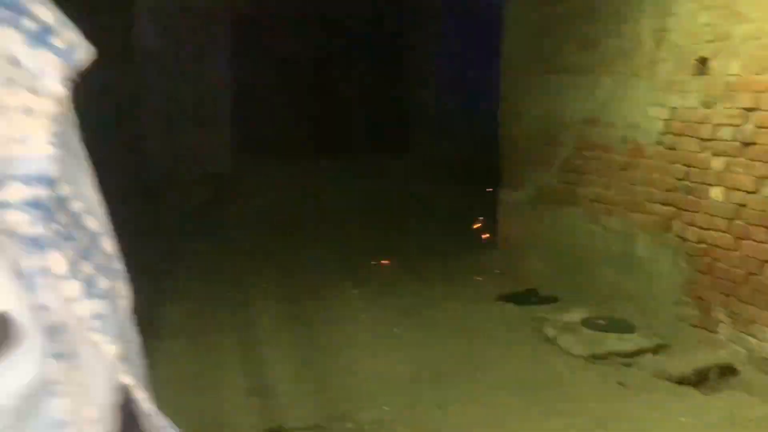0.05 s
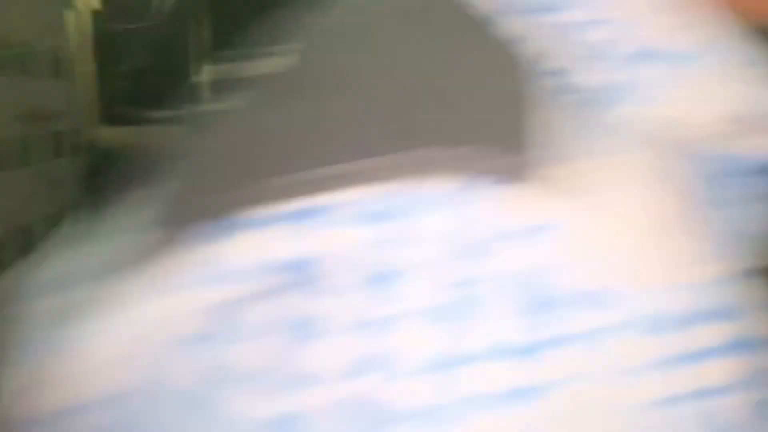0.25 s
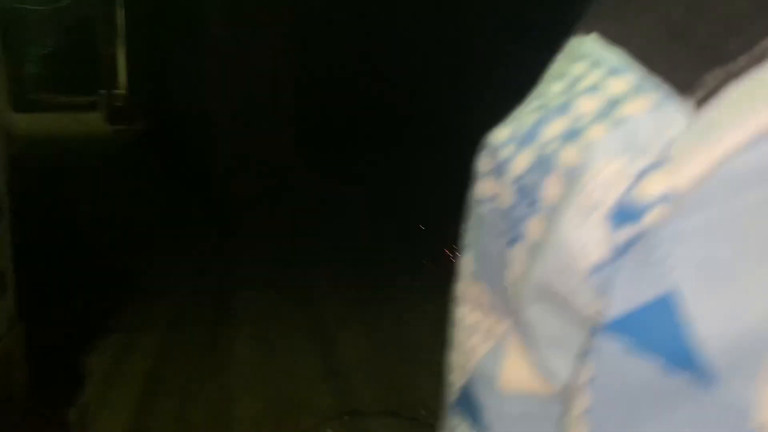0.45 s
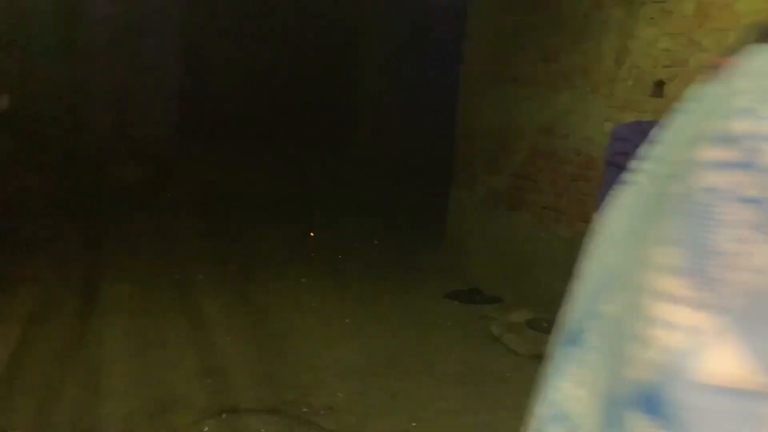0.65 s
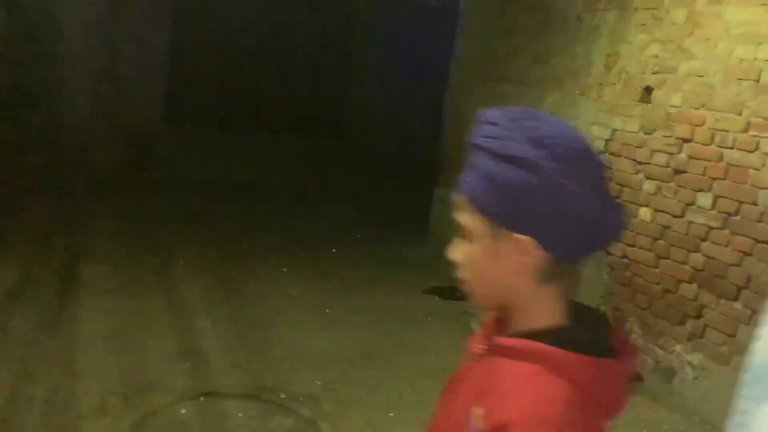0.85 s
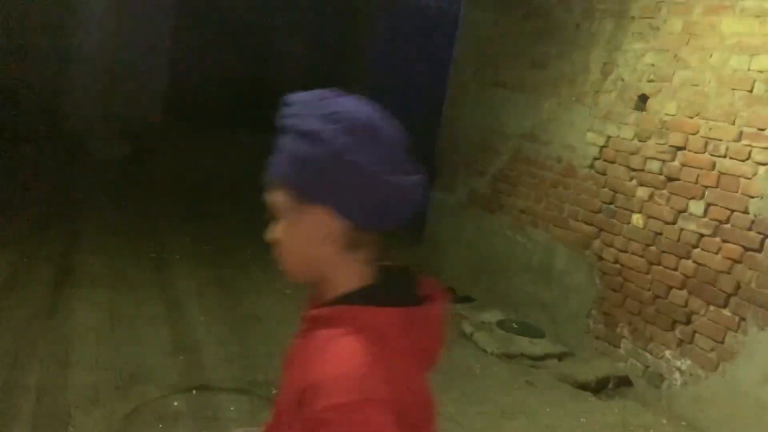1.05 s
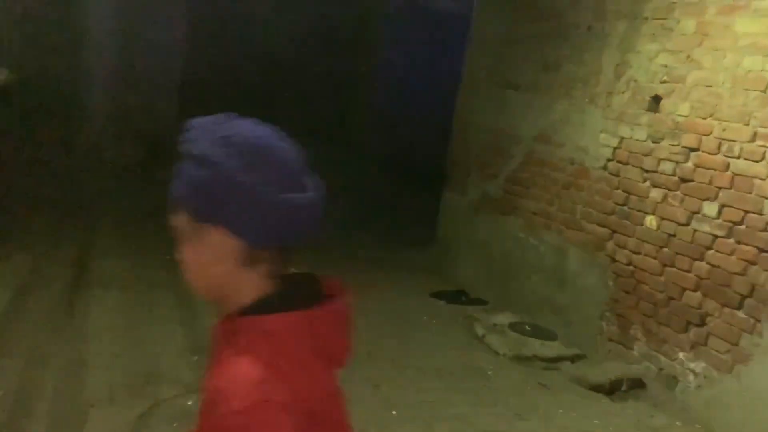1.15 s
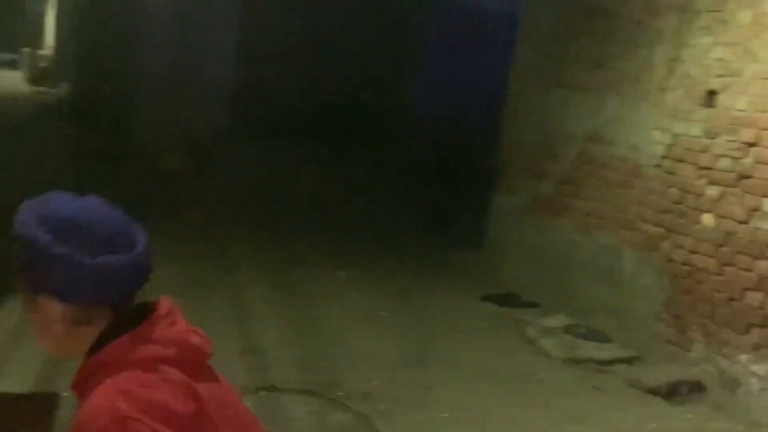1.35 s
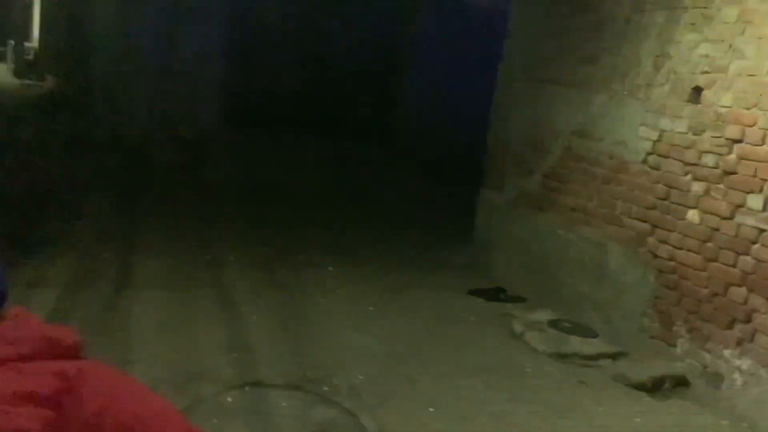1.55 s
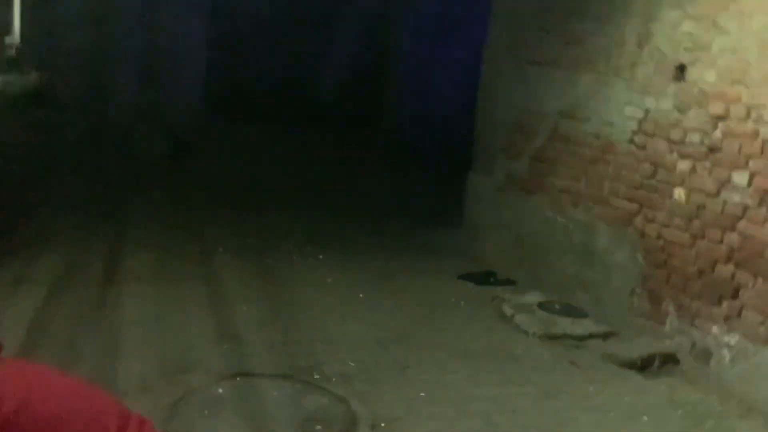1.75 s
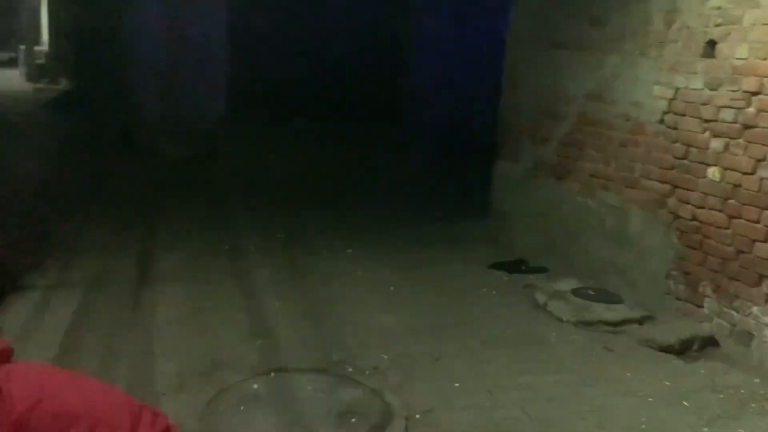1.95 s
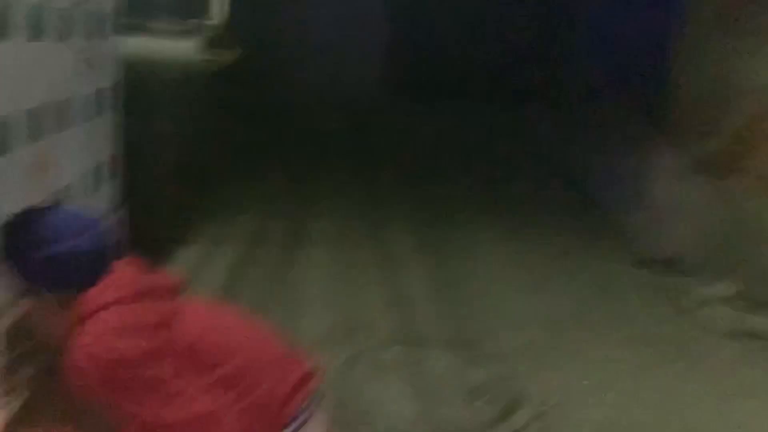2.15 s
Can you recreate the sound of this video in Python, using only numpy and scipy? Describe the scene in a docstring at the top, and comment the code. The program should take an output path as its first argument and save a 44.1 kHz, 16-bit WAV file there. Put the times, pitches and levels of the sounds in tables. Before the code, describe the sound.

A firecracker bang dominates: a soft dying roll, light scuffs and a tiny metal tinkle open the scene, then a rasping rush at 0.24 s leads into a sharp, slightly clipped crack at 0.26 s. Slaps off close brick walls and a rolling echo swell until about 0.6 s, gone by 0.9. Afterwards, close faint grit scuffs and dry ticks, clearest near 1.1, 1.3 and 1.8 s, with a tinkle near 2.0, over fading low hum.

```python
"""A firecracker goes off in a brick-walled lane at night. A rasping rush of noise leads into it, then come the
crack and its slaps off the near walls as push-and-suction pulses, then ringing sine tones and quickly dying
noise. A roll of shaped noise from down the lane starts as the dying roll of an earlier cracker and swells
again. Close by, feet scuff the grit (grainy noise bursts), small things tick and a bit of metal tinkles (short
fading sines). The town's hum is soft, low noise underneath. The loudest peaks are softly clipped."""
import sys
import numpy as np
from scipy import signal
from scipy.fft import rfft, irfft, next_fast_len
from scipy.io import wavfile
from scipy.ndimage import uniform_filter1d, map_coordinates

SR = 44100
rng = np.random.default_rng(int(sys.argv[2]) if len(sys.argv) > 2 else 0)


def inscribe(sig):
    """Save sig as 16-bit PCM at rate SR to the path in sys.argv[1].

    A 1-D sig is mono; a 2-D sig holds one channel per row.
    Samples are clipped to [-1, 1] before scaling.
    """
    pcm = np.round(np.clip(np.atleast_2d(sig).T, -1, 1) * 32767)
    wavfile.write(sys.argv[1], SR, pcm.astype(np.int16))


N = 97020
T = np.arange(N) / SR  # time of every sample [s]
CRACK_S = .2635  # when the firecracker bursts


def amp(db):
    """Turn decibels into a plain multiplier."""
    return 10 ** (np.asarray(db) / 20)


def per_side(left_right_db):
    """Turn a left and a right level [dB] into one multiplier for each side."""
    return amp(left_right_db)[:, None]


def unit(x):
    """Scale x to an average (rms) strength of 1."""
    return x / np.sqrt(np.mean(x ** 2) + 1e-20)


def along(points, hz):
    """Read a curve of (frequency [Hz], value) points, spaced by pitch (log frequency)."""
    f, v = np.transpose(points)
    return np.interp(np.log(hz + 1), np.log(f + 1), v)


def filtered(x, response):
    """Multiply each frequency of x by response(hz)."""
    m = next_fast_len(N + SR // 2)
    hz = np.fft.rfftfreq(m, 1 / SR)
    return irfft(rfft(x, m) * response(hz), m)[..., :N]


def noise(spectrum, alike, patchy_db=0):
    """Stereo noise of rms 1, with random louder and softer patches in time and pitch."""
    z = signal.stft(rng.standard_normal((2, N)), nperseg=512)[2]
    field = rng.standard_normal(z.shape[1:])
    field = uniform_filter1d(uniform_filter1d(field, 4, 0), 6, 1)
    pair = signal.istft(z * amp(patchy_db * unit(field)), nperseg=512)[1][:, :N]

    def mid_side_gain(hz):
        # This share of middle and side noise makes left and right as alike as asked.
        turn = np.arccos(np.clip(along(alike, hz), -1, 1)) / 2
        return amp(along(spectrum, hz)) * [np.cos(turn), np.sin(turn)]

    mid, side = filtered(pair, mid_side_gain)
    return unit(np.array([mid + side, mid - side]))


def shaped(x, gain_db, size):
    """Change the level of x by gain_db(hz, t), which varies over both pitch and time."""
    overlap = size - size // 4
    hz, t, z = signal.stft(x, SR, nperseg=size, noverlap=overlap)
    z = z * amp(gain_db(hz[:, None], t))
    return signal.istft(z, SR, nperseg=size, noverlap=overlap)[1][..., :N]


def swell(start, rise, hold, t60):
    """A gain that rises, holds, then falls by 60 dB in t60; all in seconds."""
    u = T - start
    attack = np.clip(u / max(rise, 1e-4), 0, 1) ** 2
    return attack * amp(-60 * np.clip(u - rise - hold, 0, None) / max(t60, 1e-3))


def wobble(rate):
    """A smooth random curve through `rate` random points a second."""
    return map_coordinates(rng.standard_normal(int(N * rate / SR) + 4), [T * rate])


def bass(hz):
    """1 in the deep bass, falling to a half at 140 Hz and to almost nothing above."""
    return 1 / (1 + (hz / 140) ** 4)


# How alike left and right are, in the hum and the roll: (frequency [Hz], likeness [0 to 1])
FAR_ALIKE = [(60, 1), (240, 0.67), (950, 0.01), (3770, 0.06), (15000, 0.19)]
# Tone colour of the town's hum: (frequency [Hz], relative level per Hz [dB])
HUM_SPECTRUM = [(15, -40), (30, -14), (55, 0.5), (90, -6.5), (175, -10.5), (250, -6.5), (450, -16),
                (700, -22.5), (1300, -25), (2500, -32), (5000, -41.5), (9000, -50), (15500, -63)]
HUM_START_DB, HUM_FADE_DB_PER_S = -47.8, 6
HUM_WAVER_DB = 1.37  # typical size of the bass waver


def town_hum():
    """Many distant sounds blur into low noise; it fades steadily while its bass wavers."""
    waver_db = HUM_WAVER_DB * wobble(8)
    hum = noise(HUM_SPECTRUM, FAR_ALIKE, patchy_db=2)
    hum = shaped(hum, lambda hz, t: np.interp(t, T, waver_db) * bass(hz / 2), size=1024)
    return amp(HUM_START_DB - HUM_FADE_DB_PER_S * T) * hum


# Tone colour of the roll before it is shaped: (frequency [Hz], relative level per Hz [dB])
LANE_SPECTRUM = [(21, -39), (35, -15), (237, -2.5), (338, -10.5), (847, -12), (4440, -32), (6680, -41.5),
                 (7210, -63.5), (7790, -44), (9070, -38.5), (11700, -62.5), (12600, -50), (15500, -70.5)]
# Course of the roll: (time [s], level before tilt and bass [dB], tilt above 300 Hz [dB per octave],
# extra bass [dB])
ROLL_COURSE = [(0, -36.5, -5, -1), (0.101, -37.5, -4.5, -2), (.2, -41.5, -3, 2), (.26, -42.5, 3, 11),
               (0.332, -35.5, 2.5, -2.5), (0.391, -32.5, 0.5, -1), (.44, -34, 0.35, 1), (.48, -33, 0, 4.5),
               (.58, -30, -0.5, -2.5), (0.621, -38, 1, 1), (.7, -40, 0, -1), (.79, -45, -1.5, -7),
               (0.861, -56, 1, -0.5), (1.05, -66.5, 0, -2), (1.301, -70, -4.5, -9)]
ROLL_ROUGH_DB = 0.5  # typical size of the quick level flutter


def lane_roll():
    """Echoes of both crackers blur into noise whose level and tone change as they die away."""
    s, level_db, tilt, bass_db = np.transpose(ROLL_COURSE)

    def gain_db(hz, t):
        octaves = np.log2(np.clip(hz, 300, None) / 300)
        return np.interp(t, s, level_db) + np.interp(t, s, tilt) * octaves + np.interp(t, s, bass_db) * bass(hz)

    roll = shaped(noise(LANE_SPECTRUM, FAR_ALIKE, patchy_db=3), gain_db, size=1024)
    return roll * amp(ROLL_ROUGH_DB * wobble(60))


# One faint, thin tone: (start [s], hold [s], frequency [Hz], level [dB])
FAINT_TONE = (1.012, .07, 3420, -71)


def thin_tone():
    """A single sine fades in, holds briefly and fades out."""
    s, hold, hz, db = FAINT_TONE
    return amp(db) * swell(s, 0.023, hold, .05) * np.sin(2 * np.pi * hz * T)


# When the metal tinkles: (time [s], level of the whole tinkle [dB])
TINKLE_TIMES = [(0.013, -49), (1.25, -61), (1.987, -55), (2.107, -67)]
# Ringing tones of the bit of metal: (frequency [Hz], middle level [dB], time to fall 60 dB [s])
METAL_TONES = [(2930, -11, 0.042), (3440, -5, 0.058), (4500, 3, 0.055), (6360, -8, 0.08), (7950, -1, .05),
               (8900, -9, 0.094), (10200, -11, 0.048), (13030, 1, 0.073)]


def tinkles():
    """Metal rings at several pitches, each fading at its own speed and varied at random each time."""
    out, t = np.zeros((2, N + SR)), np.arange(SR // 5) / SR
    for s, db in TINKLE_TIMES:
        ring = 0
        for hz, level, t60 in METAL_TONES:
            fade = amp(level + rng.normal(0, 4.7, (2, 1)) - 60 * t / t60)
            ring = ring + fade * np.sin(2 * np.pi * (hz * t + rng.random((2, 1))))
        soft_start = 1 - np.exp(-t / 0.00092)
        out[:, round(s * SR):][:, :len(t)] += amp(db) * ring * soft_start
    return out[:, :N]


# Small dry ticks: (time [s], level [dB], frequency [Hz], ring length [cycles],
# noise snap relative to the level [dB])
TICK_LIST = [(.832, -50.5, 4500, 3, -5.5), (1.066, -54.5, 4060, 10, -11), (1.107, -42, 5000, 3, -6.5),
             (1.3089, -41, 1620, 4, -13.5), (1.309, -46.5, 2430, 6, -12.5), (1.3155, -51, 4500, 6.2, -9.5),
             (1.349, -33, 1180, 1.5, -35), (1.3524, -39, 1840, 2.5, -40), (1.475, -46, 706, 1.6, -30),
             (1.7535, -44, 864, 3.2, -14.5), (1.753, -45.5, 387, 3.5, -30),
             (1.817, -45.5, 2500, 3.5, -14.5), (2.187, -46, 251, 2.2, -39)]
TICK_RISE_S = 0.0003


def ticks():
    """A knocked small thing gives a snap of noise and a few quickly fading cycles of a sine."""
    out, t = np.zeros((2, N + SR)), np.arange(SR // 5) / SR
    soft_start = 1 - np.exp(-(t / TICK_RISE_S) ** 2)
    for s, db, hz, cycles, snap_db in TICK_LIST:
        snap = amp(snap_db) * rng.standard_normal((2, len(t))) * amp(-60 * t / 0.0082)
        ring = np.sin(2 * np.pi * hz * t) * np.exp(-2 * t * hz / cycles) * soft_start
        out[:, round(s * SR):][:, :len(t)] += amp(db) * (ring + snap)
    return out[:, :N]


# Tone colour of grit before each scuff's tilt: (frequency [Hz], relative level per Hz [dB])
GRIT_SPECTRUM = [(350, -29), (600, -6), (1300, -10), (2790, 1.5), (7040, -4.5), (8750, -1), (10700, -3),
                 (11600, -33.5), (13000, -1.5), (15500, -20.5)]
# Scuffs: (start [s], rise [s], hold [s], time to fall 60 dB [s], level before tilt and pan [dB],
# tilt around 5 kHz [dB per octave])
SCUFF_LIST = [(.005, 0.0027, 0.0017, 0.19, -50, -2), (0.051, .03, 0.011, 0.26, -66.5, 3.5),
              (.115, 0.0055, .015, 0.26, -61, 3), (.2, 0.0042, .012, 0.16, -50.5, 4.5),
              (.605, 0.018, 0.049, 0.18, -58.5, 7), (0.861, 0.027, .04, 0.2, -85, 9.5),
              (1.063, 0.0025, 0.0012, 0.13, -62, -0.5), (1.101, 0.012, .004, 0.15, -53.5, 2.5),
              (1.12, .008, 0.016, 0.164, -54.5, -6), (1.2, 0.0045, 0.037, 0.41, -68.5, 2.5),
              (1.307, .002, 0.0081, 0.1505, -65, -7), (1.248, 0.0063, 0.01, 0.1456, -60, 3.5),
              (1.39, .005, 0.0067, 0.13, -75.5, -1), (1.413, .004, .005, 0.42, -67.5, -6),
              (1.458, 0.037, 0.041, .12, -55.5, 3.5), (1.645, 0.0062, 0.0546, 0.204, -71.5, -1.5),
              (1.746, 0.0065, 0.039, .06, -54.5, -4), (1.808, 0.0043, 0.01, 0.18, -53.5, -4),
              (1.964, 0.019, 0.0088, 0.2, -48, -1.5), (2.091, .008, 0.023, .1, -68.5, 1),
              (2.135, 0.027, 0.0079, 0.12, -67, -9), (2.172, 0.01, 0.0095, 0.14, -73.5, 6.5)]
GRIT_ALIKE = 0.053  # left-right likeness
GRAIN_DB, FEET_PAN_DB = 4, -2  # typical grain unevenness; left level minus right level


def feet():
    """Each scuff drags grains of grit, heard as uneven noise tilted dull or bright."""
    grains = amp(GRAIN_DB * unit(uniform_filter1d(rng.exponential(size=N), 30)))
    grit = unit(grains * noise(GRIT_SPECTRUM, [(1000, GRIT_ALIKE)], patchy_db=1.8))
    out = np.zeros((2, N))
    for start, rise, hold, t60, db, tilt in SCUFF_LIST:
        scuff = grit * swell(start, rise, hold, t60)
        out += filtered(scuff, lambda hz: amp(db + tilt * np.log2((hz + 300) / 5000)))
    return out * per_side([FEET_PAN_DB / 2, -FEET_PAN_DB / 2])


# Tone colour of the near walls' echo: (frequency [Hz], relative level per Hz [dB])
NEAR_SPECTRUM = [(30, -40), (70, -16.5), (150, -13.5), (290, -6.5), (620, -13.5), (1190, -11.5),
                 (3300, -28.5), (7000, -32.5), (9900, -25), (11500, -42.5), (14000, -35.5), (15500, -43.5)]
# How fast that echo dies: (frequency [Hz], time to fall 60 dB [s])
NEAR_DECAY = [(60, 0.47), (250, 0.29), (1000, .22), (4000, .22), (12000, 0.18)]
# How alike its left and right are: (frequency [Hz], likeness [0 to 1])
NEAR_LIKENESS = [(60, 0), (200, 1), (600, .2), (1500, 0)]
NEAR_DB = -12.5


def near_walls():
    """Dense echoes between the near walls blur into noise, each pitch dying at its own speed."""
    def decay_db(hz, t):
        return -60 * np.clip(t - CRACK_S, 0, 1) / along(NEAR_DECAY, hz)

    walls = shaped(noise(NEAR_SPECTRUM, NEAR_LIKENESS), decay_db, size=256)
    return amp(NEAR_DB) * walls * swell(CRACK_S, .002, 9, 1)  # the hold outlasts the scene


# Ringing air between the walls: (frequency [Hz], left level [dB], right level [dB],
# time to fall 60 dB [s])
AIR_TONES = [(78.2, -20.5, -15.5, 0.15), (249.4, -20, -11.5, 0.1), (968, -17, -18.5, .06),
             (2010, -19, -26.5, 0.038)]


def boom():
    """The crack sets the air between the walls ringing as a few fading sines."""
    u = np.clip(T - CRACK_S, 0, None)
    return sum(per_side([left, right]) * amp(-60 * u / t60) * np.sin(2 * np.pi * hz * u)
               for hz, left, right, t60 in AIR_TONES)


THUMP_DROP_HZ, THUMP_END_HZ, THUMP_FALL_S = 860, 340.5, .0016  # starts at the sum of both pitches
THUMP_HOLD_S, THUMP_T60_S = 0.0053, .04
THUMP_DB = [-8.5, -12]  # left, right


def thump():
    """A short sine falls quickly in pitch, holds briefly and stops."""
    u = np.clip(T - CRACK_S, 0, None)
    # Adding up the falling pitch over time gives the turns of the sine so far.
    turns = THUMP_END_HZ * u + THUMP_DROP_HZ * THUMP_FALL_S * (1 - np.exp(-u / THUMP_FALL_S))
    gain = swell(CRACK_S, 0.00031, THUMP_HOLD_S, THUMP_T60_S)
    return per_side(THUMP_DB) * gain * np.sin(2 * np.pi * turns)


# Tone colour of the rush before its tones: (frequency [Hz], relative level per Hz [dB])
RUSH_SPECTRUM = [(100, -21), (300, -5), (600, -3), (1000, -5.5), (2000, -8), (3000, -9.5), (3650, -25),
                 (4320, -20), (6400, -26), (8400, -38), (9000, -58)]
# Stronger tones in the rush: (frequency [Hz], width [Hz], left level before doubling [dB],
# right level before doubling [dB])
RUSH_PEAKS = [(452, 130, 5.5, -4), (953, 78, 1.5, 8.5), (1360, 50, -7.5, 3), (1936, 67, -9.5, 8),
              (2436, 40, 14, 11), (5766, 1500, 4, -3)]
RUSH_S, RUSH_RISE_S, RUSH_FALL_S = 0.2407, .006, 0.049  # start, rise, time to fall 60 dB
RUSH_DB = [-21.5, -7]  # left, right


def rush():
    """A rasping rush of noise with strong tones leads into the crack and fades after it."""
    def peaks(hz):
        gain = 1
        for centre, width, left, right in RUSH_PEAKS:
            bump = 2 * width ** 2 / (4 * (hz - centre) ** 2 + width ** 2)
            gain = gain + per_side([left, right]) * bump
        return gain

    rasp = noise(RUSH_SPECTRUM + [(11000, -89)], [(100, 0.076)])
    rasp = np.array([unit(side) for side in filtered(rasp, peaks)])
    hold = CRACK_S - RUSH_S - RUSH_RISE_S  # lasts until the crack
    return per_side(RUSH_DB) * rasp * swell(RUSH_S, RUSH_RISE_S, hold, RUSH_FALL_S)


CRACK_RISE_S, CRACK_WIDTH_S = .0001, .00015  # speed of the rise; time until push turns to suction


def blast(start, width):
    """A shock front: air pushes, then sucks back after `width` seconds."""
    u = np.clip(T - start, 0, None)
    return (1 - np.exp(-u / CRACK_RISE_S)) * (1 - u / width) * np.exp(-u / width)


# Slaps off the near walls: (delay after the crack [s], left level [dB], right level [dB],
# time until push turns to suction [s]); levels scale the pulse shape, before the crack's own level
WALL_SLAPS = [(.0009, -11.5, -5, .0003), (.0031, -16, -4, .0006), (.0056, -13.5, -12.5, .0004),
              (.0078, -14, 1.5, .0012), (.011, -13.5, -10.5, .0008), (.022, -13.5, -12.5, .0004),
              (.0373, -9, -13, .0002)]
CRACK_DB = [0, -2.5]  # left, right, before the doubling


def crack():
    """The burst sends out one sharp shock front, and near walls throw back later, wider ones."""
    fronts = blast(CRACK_S, CRACK_WIDTH_S)
    for delay, left, right, width in WALL_SLAPS:
        fronts = fronts + per_side([left, right]) * blast(CRACK_S + delay, width)
    return per_side(CRACK_DB) * 2 * fronts


def scene():
    """Add up everything, from the background to the firecracker."""
    background = town_hum() + lane_roll()
    close_by = thin_tone() + tinkles() + ticks() + feet()
    loud_part = near_walls() + boom() + thump() + rush() + crack()
    return background + close_by + loud_part


CLIP_TOP, CLIP_HARD = .96, 8  # highest possible level before the band limit; sharpness of the bend
TOP_HZ = 15900


def record(dry):
    """Round off the loudest peaks, then remove the deepest bass and the highest treble."""
    clipped = dry / (1 + np.abs(dry / CLIP_TOP) ** CLIP_HARD) ** (1 / CLIP_HARD)
    return filtered(clipped, lambda hz: (hz < TOP_HZ) * hz ** 4 / (hz ** 4 + 32 ** 4))


dry = scene()
out = record(dry)
inscribe(out)
```